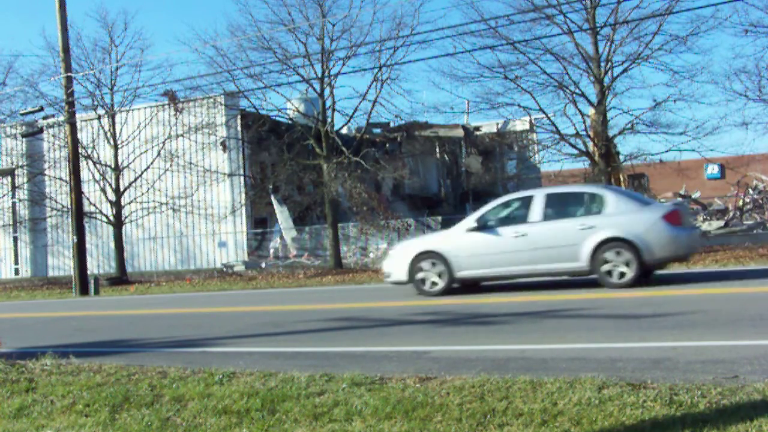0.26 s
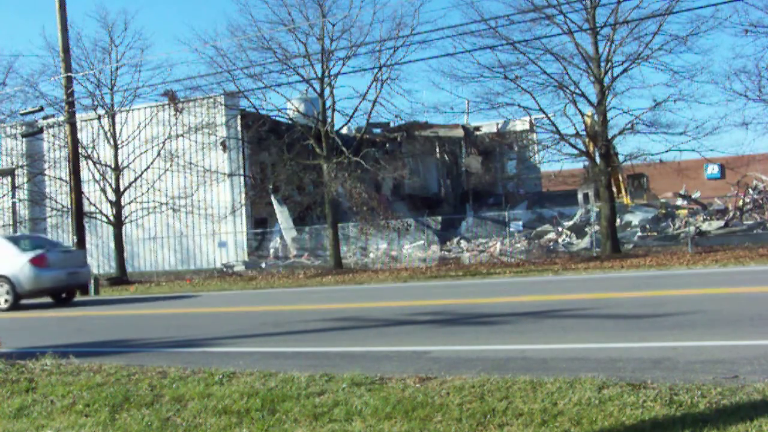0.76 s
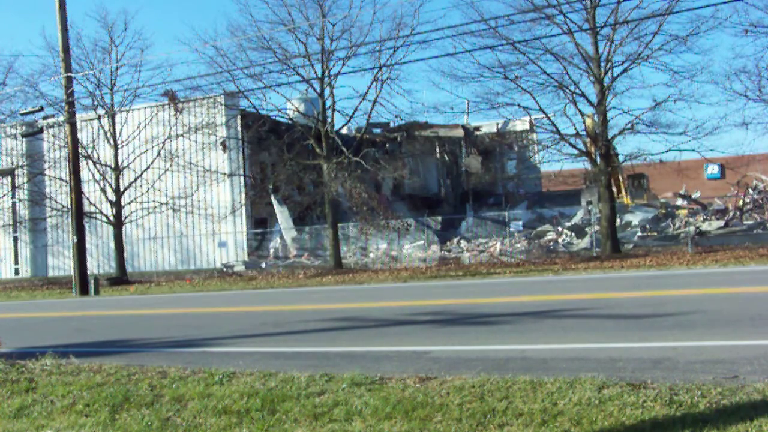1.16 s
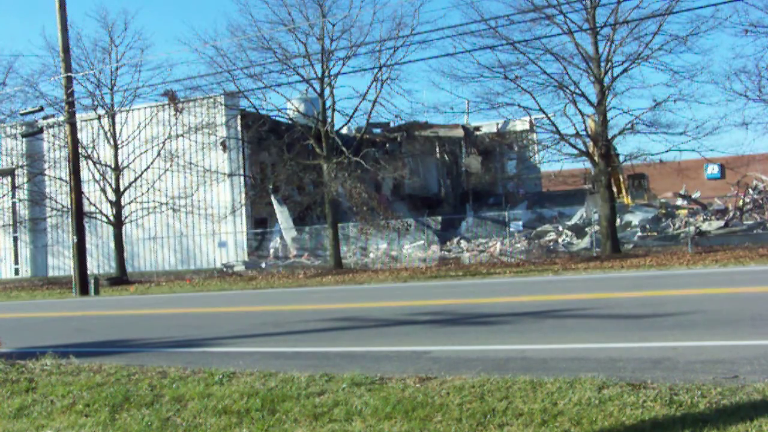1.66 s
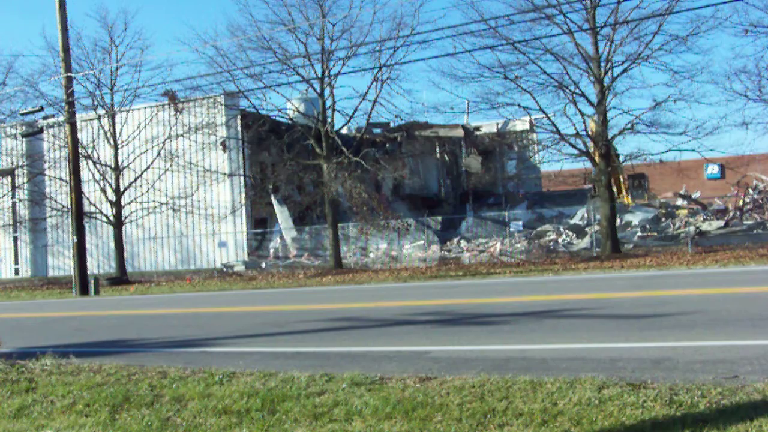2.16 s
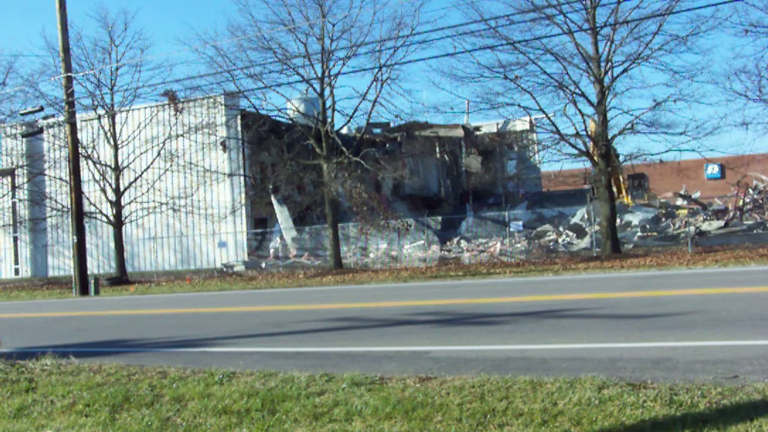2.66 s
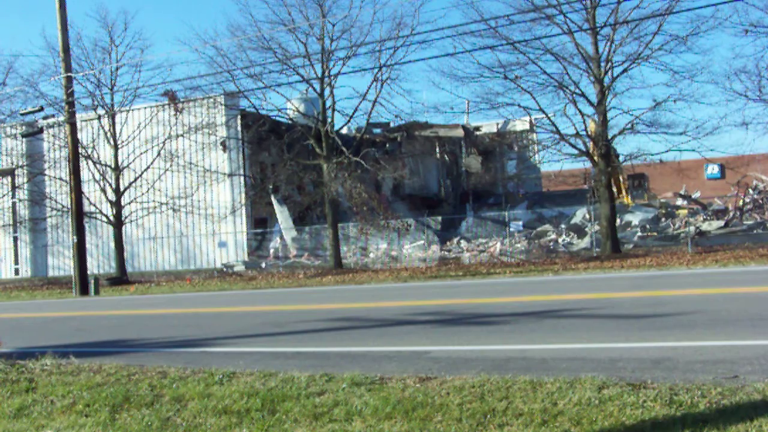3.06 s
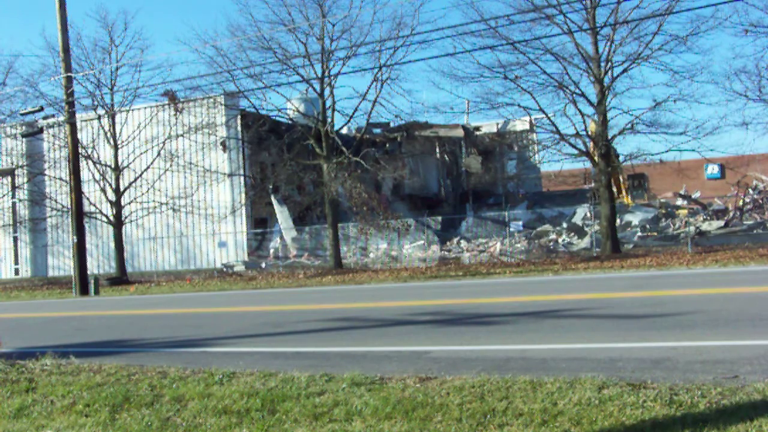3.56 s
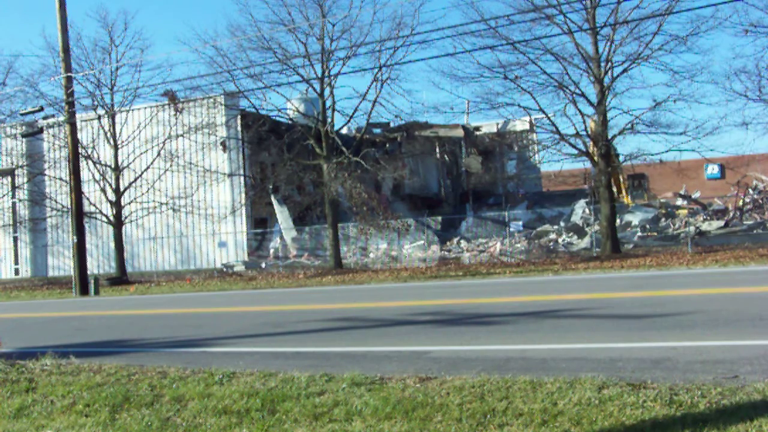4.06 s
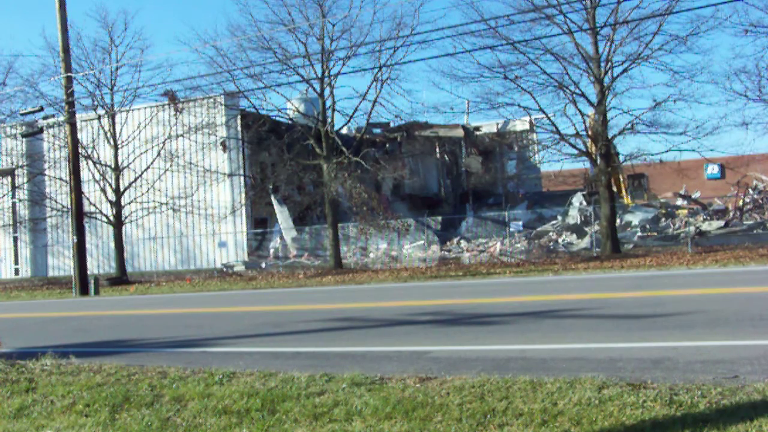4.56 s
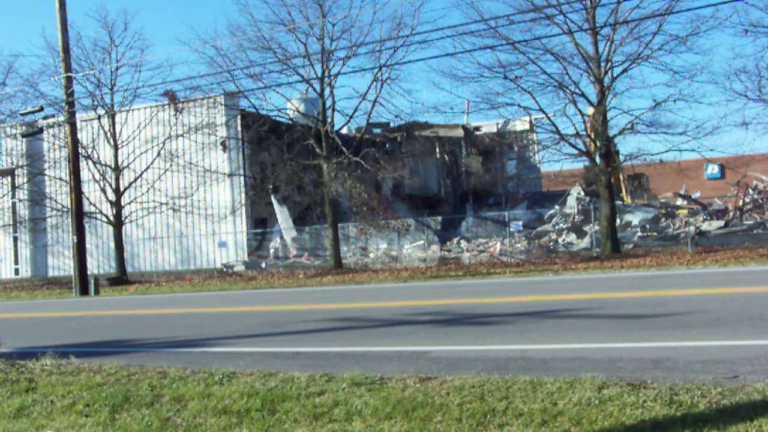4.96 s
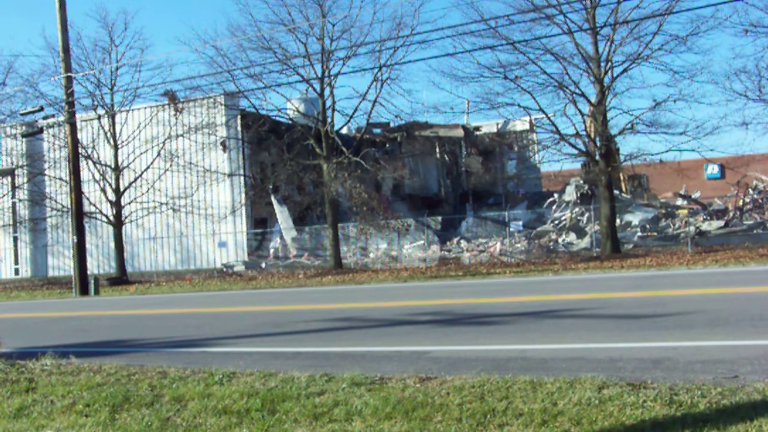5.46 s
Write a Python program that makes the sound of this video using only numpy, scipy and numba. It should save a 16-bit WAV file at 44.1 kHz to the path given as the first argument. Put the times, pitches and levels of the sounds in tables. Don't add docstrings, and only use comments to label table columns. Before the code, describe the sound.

A close tyre rush peaks within the first half second and recedes. A sharp crash near one second starts a stream of grinding debris, squealing steel and irregular knocks, densest around four seconds, then thinning to small clatters and yelps. Low engine hum and rumble continue. Dull-topped small camera sound, right channel only, with slight wall reflections.

```python
import sys
import numpy as np
from scipy import signal
from scipy.fft import rfft, irfft
from scipy.io import wavfile
from scipy.ndimage import uniform_filter1d
from numba import njit

SR = 44100
rng = np.random.default_rng(int(sys.argv[2]) if len(sys.argv) > 2 else 0)


def attenuation_scalar(level_db):
    decades = np.asarray(level_db, float) / 20
    return 10 ** decades


def generate_wav(signal):
    frames = np.transpose(np.atleast_2d(signal))
    scaled = np.clip(frames, -1, 1) * 32767
    pcm = np.round(scaled).astype(np.int16)
    wavfile.write(sys.argv[1], SR, pcm)


N = 252384
TIME = np.arange(N) / SR


def level(x, db):
    return x * attenuation_scalar(db) / np.sqrt(np.mean(x ** 2))


def colour(x, table):
    hz, db = np.transpose(table)
    bins = np.maximum(np.fft.rfftfreq(N, 1 / SR), 1)
    gain_db = np.interp(np.log(bins), np.log(hz), db)
    return irfft(rfft(x) * attenuation_scalar(gain_db), N)


def walk(rate_hz):
    hold = int(SR / rate_hz)
    steps = np.repeat(rng.standard_normal(N // 50), hold)[:N + hold]
    return 1.3 * uniform_filter1d(uniform_filter1d(steps, hold), hold)[:N]


@njit
def moving_resonance(x, hz, width_hz):
    out, band, low = np.empty(len(x)), 0., 0.
    for i in range(len(x)):
        g, damping = np.tan(np.pi * hz[i] / SR), width_hz / hz[i]
        v = (band + g * (x[i] - low)) / (1 + g * (g + damping))
        band, low = 2 * v - band, low + 2 * g * v
        out[i] = damping * v
    return out


@njit
def rings(start, hz, cycles, size, soft):
    out = np.zeros(N)
    for k in range(len(start)):
        turn = np.exp((2j * np.pi - np.log(1000.) / cycles[k]) * hz[k] / SR)
        swing = size[k] + 0j
        push, grow = 0., hz[k] / SR / soft
        end = min(start[k] + int(cycles[k] * SR / hz[k]), N)
        for i in range(max(start[k], 0), end):
            push = min(push + grow, 1.)
            out[i] += swing.imag * push
            swing *= turn
    return out


def pieces(s, hz, db, chance, cycles, scatter_db):
    turns = cycles * np.exp(1.2 * (chance[0] - .5)) * (hz / 2000) ** 0.39
    luck = np.minimum(-np.log(chance[1]), 4)
    polarity = np.sign(chance[2] - .5)
    size = attenuation_scalar(db + scatter_db * luck) * np.sqrt(hz / turns / 100) * polarity
    return rings((s * SR).astype(np.int64), hz, turns, 1.57 * size, 0.93)


# frequency in Hz, level in dB per Hz.
RUSH_TONE = [(20, -23.5), (40, -9.5), (100, 0), (230, -7), (330, -14.5), (700, -5), (3000, -9), (8000, -23)]
# peak in seconds, rise of the rumble in dB.
THUDS = [
    (.02, 2.5),
    (.44, 7),
    (2.05, 0),
    (3.33, 7.5),
    (3.87, 7.5),
    (4.1, 4),
    (4.91, -1),
    (5.4, 3.5),
]


def site():
    rush = rfft(level(colour(rng.standard_normal(N), RUSH_TONE), -33))
    place = 2 * np.log2(np.maximum(np.fft.rfftfreq(N, 1 / SR), 1) / 300)
    rise_s, fall_s = 0.1, 0.13
    shake_db = sum(db * np.interp(TIME - s, [-rise_s, 0, fall_s], [0, 1, 0]) for s, db in THUDS)
    rumble_db = 3 - 0.13 * TIME + shake_db + 1.0 * walk(6)
    out = irfft(rush * np.sqrt(np.clip(-place, 0, 1)), N) * attenuation_scalar(rumble_db)
    for k in range(11):
        patch = irfft(rush * np.clip(1 - abs(place - k), 0, 1), N)
        out += patch * attenuation_scalar(0.5 * walk(5.3) + 2.75 * walk(25.06))
    return out


# time in seconds, low order in Hz, its level in dB, high order in Hz, its level in dB.
DIESEL = [
    (0, 112, -40, 160, -70),
    (0.999, 108, -44, 158, -47.5),
    (1.701, 104, -42, 157, -42),
    (2.8, 100, -47, 155, -42),
    (3.2, 100, -53.5, 152, -50),
    (3.8, 102, -39.5, 146, -42),
    (4.6, 105, -56.5, 139, -40),
    (5, 110, -50, 138, -47),
    (5.72, 116, -50, 138, -58.5),
]


def diesel():
    s, low_hz, low_db, high_hz, high_db = np.transpose(DIESEL)
    out = 0
    for hz, db in (low_hz, low_db), (high_hz, high_db):
        wandering_hz = np.interp(TIME, s, hz) * (1 + 0.0197 * walk(7.2))
        phase = 2 * np.pi * np.cumsum(wandering_hz) / SR
        out = out + attenuation_scalar(np.interp(TIME, s, db) + 0.5 + 1.8 * walk(14)) * np.sin(phase)
    return out


# frequency in Hz, level in dB.
TYRES = [(150, -8), (300, -9), (450, -6), (800, -5), (1600, 7.5), (2600, -4.5), (4500, -12), (8000, -48.5)]


def car():
    turn = .5 + .5 * np.tanh((TIME - 0.3) / 0.16)
    roar = level(colour(rng.standard_normal(N), TYRES), -0.5)
    roar = roar * attenuation_scalar(-4 * turn)
    tread_from_hz, tread_to_hz = 780, 1340
    tread_hz = tread_from_hz + (tread_to_hz - tread_from_hz) * turn
    tread = level(moving_resonance(rng.standard_normal(N), tread_hz, 360.0), -2.3)
    passes_s, near_s = .45, 0.52
    far = 1 + ((TIME - passes_s) / near_s) ** 2
    return (roar + tread) * attenuation_scalar(-25 - 15.7 * np.log10(far) + 1.0 * walk(12.9))


# start in seconds, length in seconds, pitch in Hz,
# level in dB, share of it spent swelling (0-1).
SQUEALS = [
    (2.13, .12, 2045, -35, .4),
    (2.4, .06, 2055, -39, .3),
    (2.2, .24, 2055, -27.5, .42),
    (5.252, .085, 1772, -27.5, .1),
    (5.255, .04, 3544, -36, .2),
    (5.363, .075, 1772, -33, .1),
    (5.363, .03, 3544, -39, .3),
    (5.55, .035, 1550, -35, .3),
    (1.2, .1, 420, -41, .4),
    (3.9, .9, 283, -44, .7),
]
# start in seconds, length in seconds, first pitch in Hz, level in dB, share of it spent swelling (0-1).
CHIRPS = [
    (3.787, .03, 3900, -30, .1),
    (3.875, .03, 3650, -31, .3),
    (4.033, .045, 3720, -22.5, .15),
    (4.085, .035, 3650, -33, .3),
]


def squeals():
    out, waver, grip = np.zeros(N), walk(150), walk(140)
    for table, sag_hz_s in (SQUEALS, 0), (CHIRPS, 6000):
        for start, length, hz, db, swell in table:
            span = slice(int(start * SR), int((start + length) * SR))
            age = TIME[span] - start
            ramp = np.minimum(age / swell, (length - age) / (1 - swell)) / length
            gate = np.clip(1.4 * ramp, 0, 1)
            pitch = (hz - sag_hz_s * age) * (1 + .005 * waver[span])
            phase = 2 * np.pi * np.cumsum(pitch) / SR
            tone = np.sin(phase) + attenuation_scalar(-25) * np.sin(2 * phase)
            out[span] += gate * attenuation_scalar(db + 1.5 * grip[span]) * tone
    return out


# time in seconds, peak of the very top in dB.
TICKS = [(0.342, -53.5), (0.4708, -54.5), (0.4988, -50.5), (0.5744, -58), (0.9698, -45.5), (1.117, -32.5),
         (1.3708, -52), (1.4943, -46.5), (1.5578, -53), (2.383, -47), (3.044, -46), (3.0755, -48),
         (3.2124, -41.5), (3.2914, -44), (3.5427, -48), (3.642, -44), (3.677, -45.5), (3.9106, -41),
         (3.9702, -45.5), (4.0432, -35), (4.1074, -43), (4.138, -55.5), (4.2075, -41), (4.2822, -38),
         (4.6136, -41), (5.3023, -42.5)]


def chips():
    s, db = np.transpose(TICKS)
    return rings((s * SR).astype(np.int64), 7600 + 0 * s, 4 + 0 * s, attenuation_scalar(db + 38), .01)


# time in seconds, flow in dB, fineness in dB (grit gains what heavy pieces lose).
SLIDE = [(0.9, -30.5, -4), (1.17, -29.5, 0.5), (1.53, -25, 3), (1.881, -26, -0.5), (2.0, -21.5, 1.5),
         (2.13, -29, 0), (2.31, -32, -4.5), (2.74, -35.5, -1.5), (2.81, -25.5, 1), (2.99, -26, 1),
         (3.76, -23.5, 1.5), (3.84, -19, 0), (4.05, -24.5, 1.5), (4.22, -20, 2), (4.4, -31, 0.5),
         (4.89, -45, -1), (5.33, -46, -4), (5.72, -38, 3)]
PIECE_HZ = [700, 2000, 5000]


def rubble():
    s, flow_db, fine_db = np.transpose(SLIDE)
    chance = rng.random((5, 46000))
    when = chance[4] * N / SR
    hz = 140 * 57. ** chance[3]
    fine = np.interp(np.log(hz), np.log(PIECE_HZ), [-1, 0, 1])
    heavy_db, grit_db = -6, -7.5
    size_db = np.where(fine < 0, -heavy_db, grit_db) * fine
    surge_db = .8 * walk(30)[(when * SR).astype(int)]
    db = np.interp(when, s, flow_db) + fine * np.interp(when, s, fine_db) + size_db + surge_db
    return attenuation_scalar(-10.5) * pieces(when, hz, db, chance, cycles=9.75, scatter_db=2.5)


# start in seconds, level in dB, pitch in Hz, length in seconds.
CRASHES = [(1.110, -19.5, 2205, .069), (2.04, -31.5, 2580, 0.15), (2.775, -34, 4470, .12),
           (2.877, -23.5, 1390, .085), (3.55, -35.5, 3480, .061), (3.648, -26.5, 870, .07),
           (3.68, -25, 1207, .08), (4.030, -21, 2110, .09), (4.105, -24.5, 3540, .05),
           (4.136, -20.5, 2360, .054), (4.24, -28, 2420, .078), (4.29, -31, 1684, .068),
           (4.34, -29.5, 2060, .051), (4.435, -31, 4510, 0.053), (5.036, -36.5, 3010, .049),
           (5.10, -35, 1140, .079), (5.247, -35, 4590, 0.068)]
# start in seconds, level in dB, pitch in Hz, length in seconds.
SLABS = [(1.215, -31, 1770, .073), (1.44, -31, 1200, 0.074), (1.575, -30, 1255, .11),
         (1.635, -27.5, 1300, .16), (1.912, -29, 1410, .2), (2.32, -25.5, 793, .11),
         (2.465, -32, 1770, 0.062), (2.915, -29.5, 1290, 0.18), (3.075, -36, 1350, 0.071),
         (3.325, -27.5, 1007, 0.06), (3.41, -29, 1018, .14), (3.822, -23, 1326, .13),
         (3.888, -32.5, 1610, .077), (5.406, -31, 1040, .038), (5.55, -36.5, 1450, .083),
         (5.68, -39.5, 1810, .049)]
# start in seconds, level in dB, pitch in Hz, length in seconds.
BRICKS = [(1.63, -25.5, 3580, .2), (1.715, -33.5, 3140, .12), (1.762, -29, 2400, 0.045),
          (2.325, -32.5, 3520, .07), (2.98, -27.5, 2620, .064), (3.18, -30, 2370, .07),
          (3.318, -31.5, 2810, .062), (3.455, -30, 2280, .051), (3.955, -28.5, 3480, .041),
          (4.189, -29.5, 2250, 0.063), (4.613, -27, 3790, .076), (4.712, -31.5, 2800, .08),
          (4.92, -38, 3660, .06)]
# start in seconds, level in dB, pitch in Hz, length in seconds.
SHARDS = [(1.36, -33.5, 4380, 0.11), (1.405, -27.5, 4250, 0.12), (1.895, -38, 5190, 0.12),
          (1.945, -28.5, 5200, .11), (2.43, -32, 4200, .049), (2.877, -29, 5090, .16),
          (2.97, -34.5, 5300, 0.083), (3.073, -26.5, 4840, .056), (3.215, -26, 4940, .073),
          (3.39, -27.5, 4310, .12), (3.46, -32.5, 4320, 0.074), (3.789, -25.5, 4110, .066),
          (3.83, -33.5, 6470, .12), (4.48, -34, 6370, 0.034), (4.98, -41.5, 3800, .06),
          (5.303, -31.5, 6520, .037), (5.478, -39.5, 5100, 0.093)]


def knocks():
    kinds = (CRASHES, 1.245), (SLABS, 0.56), (BRICKS, .55), (SHARDS, .55)
    falls = [(*row, octaves) for table, octaves in kinds for row in table]
    s, db, hz, length, octaves = np.repeat(falls, 300, axis=0).T
    chance = rng.random((len(s), 6)).T
    late = .6 * length * chance[3]
    pitch = np.clip(hz * 2 ** (1.623 * octaves * (chance[4] + chance[5] - 1)), 200, 8500)
    build_db = 20 * np.log10(np.minimum(.5 + late / 0.0086, 1))
    die_db = -45 * (late / length) ** 2.0
    db = db + die_db + build_db + 10 * np.log10(length / 0.11)
    return attenuation_scalar(-7.0) * pieces(s + late, pitch, db, chance, cycles=12.0, scatter_db=2.0)


# frequency in Hz, gain in dB.
GROUND = [(140, -7.5), (250, 2), (330, -6.5), (450, 0.5), (640, 3.5), (1200, 4), (3000, 2.5), (7500, 0)]


def scene():
    background = site() + diesel() + car()
    debris = chips() + colour(rubble() + knocks(), GROUND)
    lag = np.arange(SR // 2) / SR
    walls = rng.standard_normal(len(lag)) * attenuation_scalar(-60 * lag / .5) * np.minimum(lag / 0.013, 1)
    walls = attenuation_scalar(-5.5) * walls / np.sqrt(np.sum(walls ** 2))
    echo = signal.fftconvolve(debris, walls)[:N]
    heard = 2 * (background + squeals() + debris + echo)
    crosstalk = attenuation_scalar(-46) * heard
    return np.array([crosstalk, heard])


def low_pass(x):
    return signal.sosfilt(signal.butter(12, 8820, fs=SR, output="sos"), x)


# frequency in Hz, level in dB.
HISS = [(25, -7), (90, 0), (600, 3.5), (2000, 2), (5000, -1.5), (7000, 0), (7900, -8.5), (8100, -45.5)]
# centre in Hz, width in Hz, gain in dB.
NOTCHES = [(303, 90, -13), (548, 60, -4), (972, 26, -10)]


def record(dry):
    hiss = [level(colour(rng.standard_normal(N), HISS), -54) for _ in dry]
    bins = np.fft.rfftfreq(N, 1 / SR)
    dips_db = sum(db * np.exp(-(2 * (bins - hz) / width) ** 2) for hz, width, db in NOTCHES)
    top_db = np.interp(bins, [6800, 7460, 7910, 8950, 9100], [0, -7.0, -17, -28.0, -58])
    rounded = 1.1 * np.tanh(dry / 1.1)
    x = irfft(rfft(rounded + hiss) * attenuation_scalar(dips_db + top_db), N)
    spill_band = signal.butter(6, [7600, 9000], "band", fs=SR, output="sos")
    spill = signal.sosfilt(spill_band, x ** 3)
    return low_pass(x + .6 * spill)


dry = scene()
out = record(dry)
generate_wav(out)
```